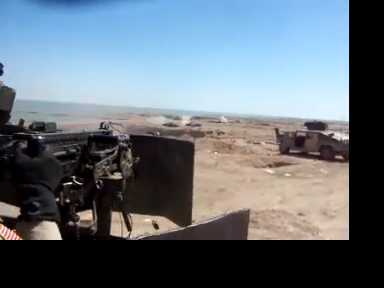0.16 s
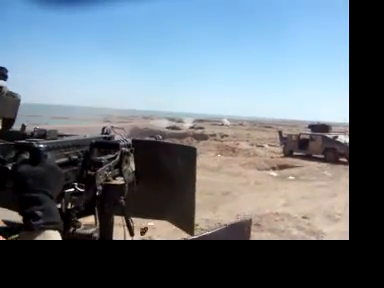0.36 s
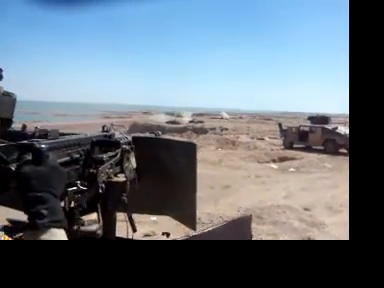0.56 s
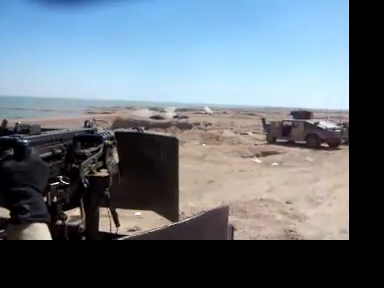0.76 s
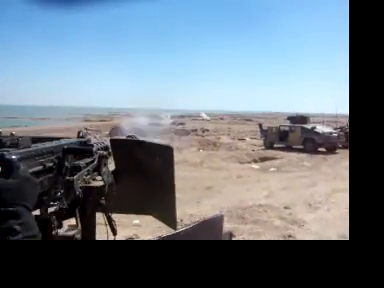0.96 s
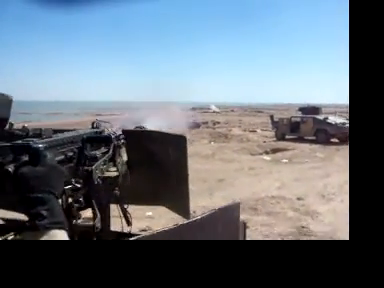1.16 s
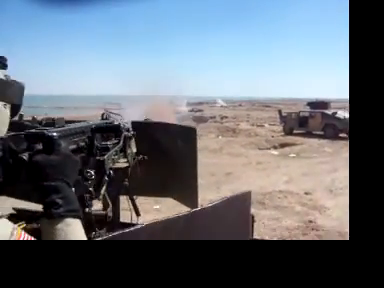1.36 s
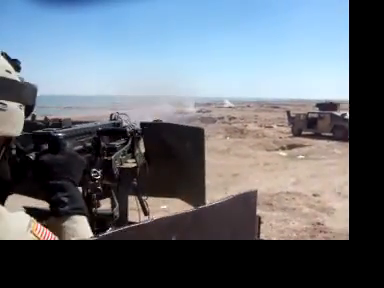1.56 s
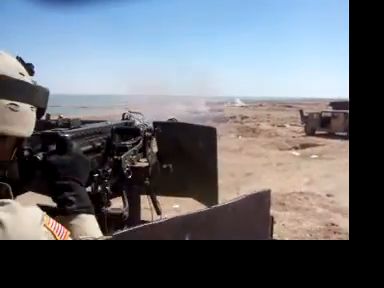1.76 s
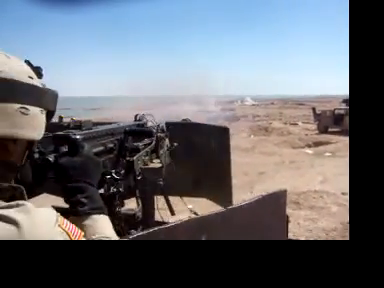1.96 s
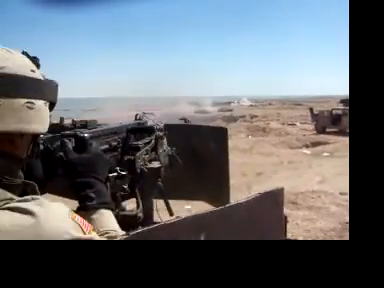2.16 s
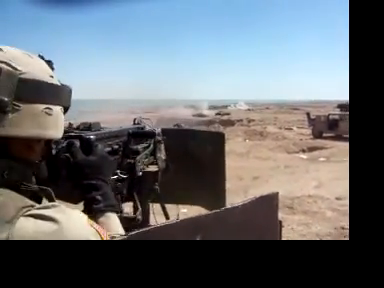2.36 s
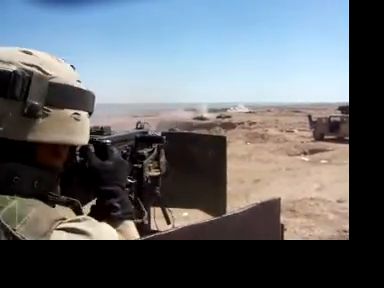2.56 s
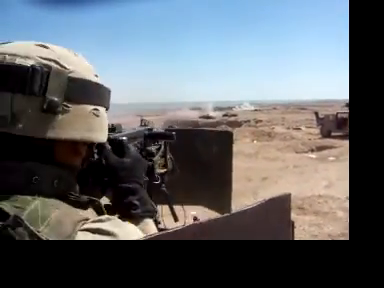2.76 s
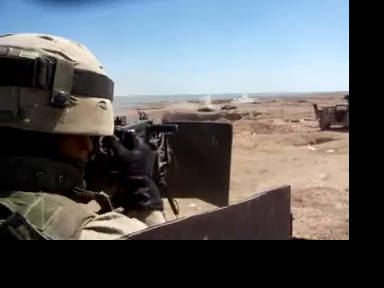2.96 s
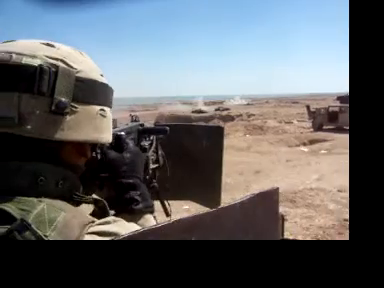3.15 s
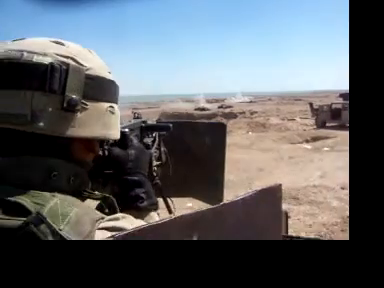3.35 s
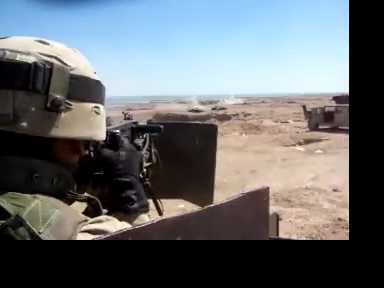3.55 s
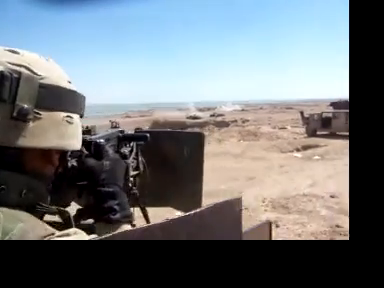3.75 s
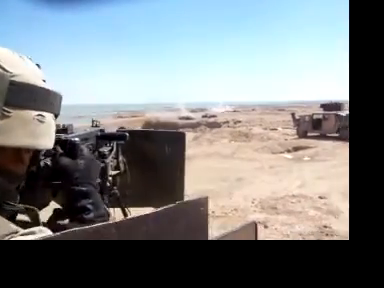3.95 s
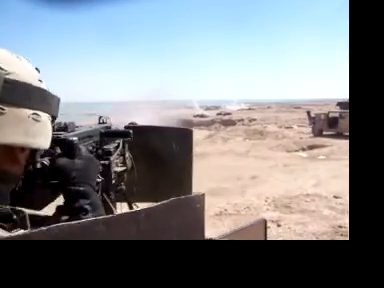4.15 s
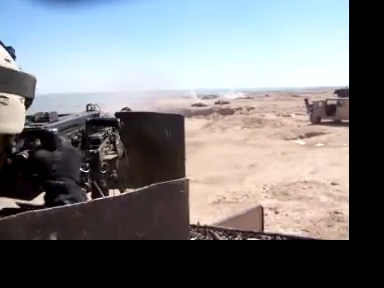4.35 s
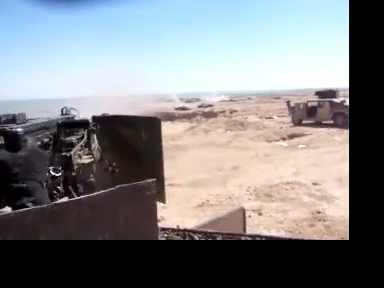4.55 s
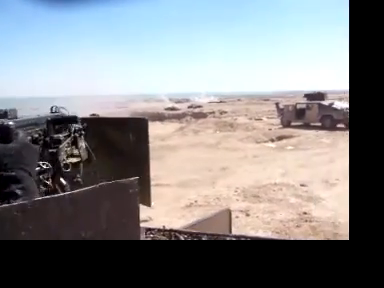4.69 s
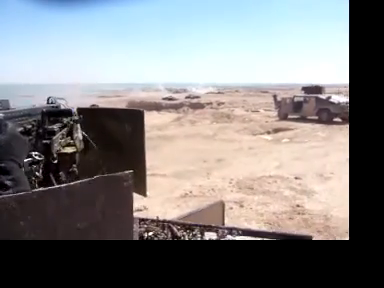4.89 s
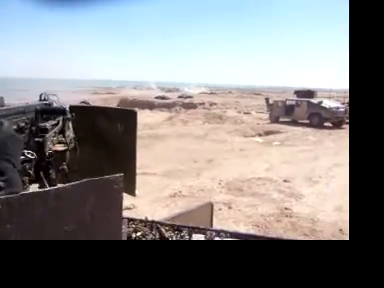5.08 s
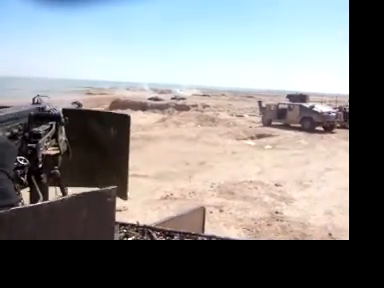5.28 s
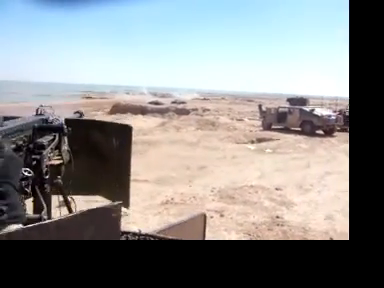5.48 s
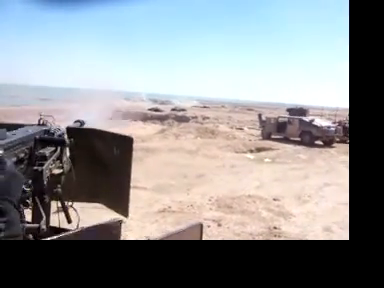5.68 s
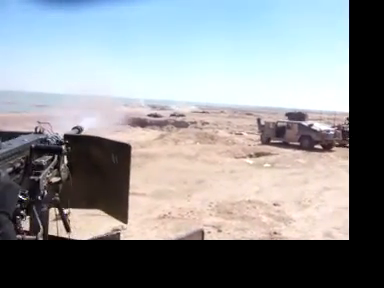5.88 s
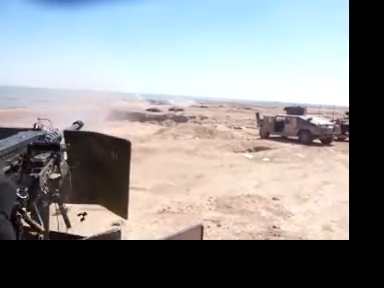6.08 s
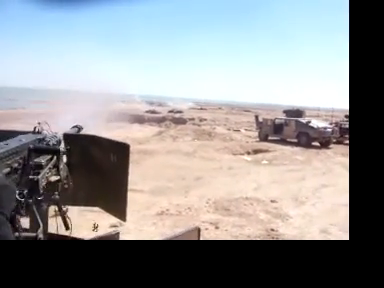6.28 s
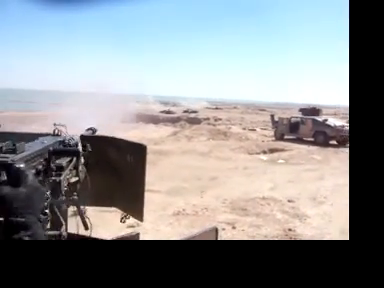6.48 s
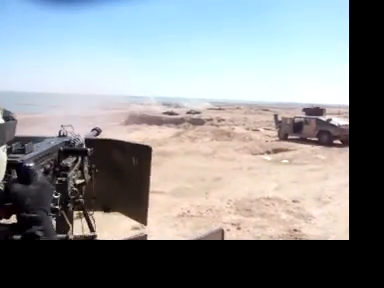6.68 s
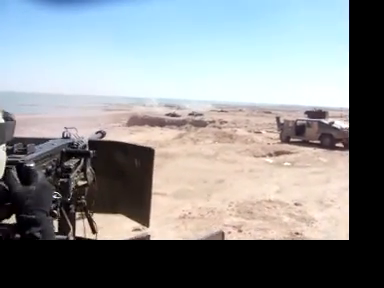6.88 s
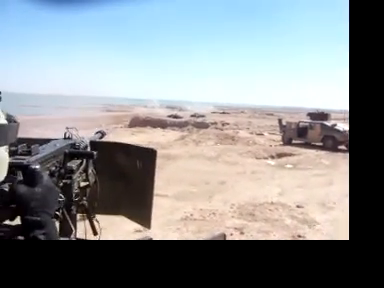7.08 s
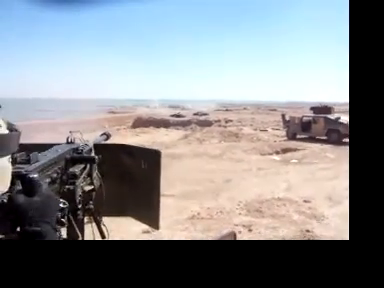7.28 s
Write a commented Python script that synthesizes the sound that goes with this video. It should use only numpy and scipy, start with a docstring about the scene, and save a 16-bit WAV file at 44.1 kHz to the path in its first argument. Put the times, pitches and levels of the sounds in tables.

```python
"""The tail of an earlier burst is heard first; then a heavy machine gun on a vehicle turret fires three bursts.
Each shot is shaped noise: a bright crack, a boom in the steel turret and a deep thump, with clashes of the action.
The ground scatters the shots back as a rolling echo. Cases and belt links clatter on the roof, as short noise
contacts through steel resonances; a few cases ring as decaying sines. Dull knocks and a low wind lie beneath.
The firing overloads the microphone, which squashes it and makes it crackle."""
import sys
import numpy as np
from scipy import signal
from scipy.fft import rfft, irfft
from scipy.io import wavfile
from scipy.ndimage import uniform_filter1d

SR = 44100
rng = np.random.default_rng(int(sys.argv[2]) if len(sys.argv) > 2 else 0)


def dump_mix(stems):
    """Bounce the given channels to the path in sys.argv[1] as a 16-bit WAV at rate SR."""
    frames = np.atleast_2d(stems).T  # one column per channel
    limited = np.clip(frames, -1, 1)  # hard clip at full scale
    pcm = np.round(limited * 32767).astype(np.int16)
    wavfile.write(sys.argv[1], SR, pcm)


N = 324135

# Only the shape of a spectrum matters: colour() sets its overall level.
# low rumble of air at the microphone: freq_hz, density_db (relative, per Hz)
WIND_SPECTRUM = [(12, -33.5), (20, -0.5), (37, -5), (54, -4), (150, -13), (348, -26.5), (1180, -30),
                 (1820, -45), (2730, -42.5), (4110, -80.5), (4500, -72.5), (5850, -115), (9900, -120)]
# bright crack of each blast: freq_hz, density_db (relative, per Hz)
CRACK_SPECTRUM = [(60, 2.5), (300, -12.5), (480, 0), (680, 3), (1100, -0.5), (1350, -3.5), (1700, -6),
                  (2100, -6.5), (2700, -5.5), (3300, -14.5), (3900, -14), (5000, -14.5)]
# boom inside the turret: freq_hz, density_db (relative, per Hz)
BOOM_SPECTRUM = [(25, -46.5), (55, -28.5), (90, -6.5), (140, -6), (200, 0.5), (340, -1.5), (550, -8),
                 (800, -18), (1100, -10), (1600, -31), (2600, -20), (4000, -30.5)]
# deep end of each blast: freq_hz, density_db (relative, per Hz)
THUMP_SPECTRUM = [(25, -15), (55, -6), (85, 0.5), (115, -2.5), (160, -3.5), (230, -9), (400, -15.5),
                  (1000, -22), (4000, -44.5)]
# clash of the steel action: freq_hz, density_db (relative, per Hz)
BOLT_SPECTRUM = [(100, -23.5), (600, -17), (1100, -7.5), (1700, -17), (2600, -3.5), (3300, -12.5),
                 (4000, -18), (5000, -28.5)]
# roll returned by the ground: freq_hz, density_db (relative, per Hz)
ECHO_SPECTRUM = [(30, -13.5), (70, -2.5), (130, 3), (220, -1), (350, -8.5), (700, -15.5), (1200, -29.5),
                 (1700, -24.5), (2600, -44), (4000, -49)]
# bump on the gun mount: freq_hz, density_db (relative, per Hz)
KNOCK_SPECTRUM = [(40, 0.5), (110, 12.5), (200, 5.5), (400, -0.5), (700, 0), (1100, -17), (1700, -26),
                  (4000, -46)]
# steel roof under falling brass, broad colour: freq_hz, density_db (relative, per Hz)
STEEL_SPECTRUM = [(100, -3), (400, -6.5), (620, -1), (1000, -1), (1320, 0), (1700, -15.5), (2050, -6.5),
                  (2600, -6), (3200, -11.5), (3900, -16), (5000, -11)]
# air resonances of the turret: centre_hz, width_hz, lift_db
TURRET_MODES = [(200.8, 8.3, 8), (248, 5.9, -3.5), (330.6, 6.7, 5), (419.6, 8, 3.5), (473.6, 10, 6),
                (552.3, 4.9, 8)]
# modes of the steel roof, before each landing varies them: centre_hz, width_hz, lift_db
ROOF_MODES = [(574, 8.4, 7), (667, 47, 3.8), (938, 22, 7.8), (1022.6, 22, 8.1), (1120, 38, 6.5),
              (1284, 95, 5), (1541, 34, 7.5), (2020, 50, 4), (2390, 56, 7.1), (2620, 42, 6.5),
              (2798, 69, 8.3)]
# partials of an empty case, before slight detuning: pitch_hz, level_db (relative), t60_s
CASE_PARTIALS = [(2390, -7, .6), (3700, -1.5, 1), (3760, -3.5, 0.41), (4180, -5.5, .9)]
# loudest cases and links landing: start_s, level_db (relative), treble_db (relative), decay_s
CLANK_EVENTS = [(.057, -9, -7, 0.011), (.164, -12, -9, 0.0074), (.26, -14.5, -26, .007),
                (.307, -22, -3, 0.014), (.363, -26, 7.5, .005), (.471, -9.5, -15.5, .011),
                (.496, -11.5, -13, 0.019), (.583, -20.5, -6.5, 0.0088), (2.182, -3.5, 1, 0.008),
                (2.275, 1, -11, 0.0091), (2.433, -3, -2.5, 0.017), (2.5, -12, 2.5, 0.0072),
                (2.594, -16, -12, .012), (2.825, -26.5, 0.5, 0.0097), (2.888, -31, 4, .013),
                (3.056, -29, 6, 0.016), (3.412, -29, -10, 0.011), (4.905, -13, 0, 0.023),
                (4.974, 1, -5.5, 0.02), (5.022, 11, -4, .009), (5.112, -5.5, -3, 0.0097),
                (5.146, -20.5, 12.5, 0.0086), (5.183, -11, -6, 0.017), (5.246, -13.5, -14, 0.019),
                (5.347, -20, -6, 0.036), (5.531, -18, -21, 0.014), (6.831, 2.5, 1.5, .009),
                (6.894, -16, -15, 0.047), (6.978, -6, -2, 0.011), (7.082, -1, -4, 0.014)]
# dull knocks on the mount: start_s, level_db (relative)
KNOCK_EVENTS = [(0.653, -17.5), (0.765, -17), (2.727, -20.5), (3.174, -25.5), (3.267, -28.5), (3.348, -24),
                (3.41, -18.5), (3.781, -25), (3.81, -21.5)]
# cases that bounce free and ring: start_s, level_db (relative)
RING_EVENTS = [(.654, -52), (2.678, -40.5), (4.779, -36), (5.437, -44.5)]
# a sharp tick just after the first of the three bursts: start_s, level_db (relative)
TICK_EVENTS = [(2.1926, -19)]
# bursts of fire: first_round_s, rounds (count), crack_db, boom_db, loose_brass_db (levels relative)
BURST_TABLE = [(-.205, 1, -10, 3, -1.5), (.992, 10, 3.5, 1.5, 0), (4.075, 5, 2, 1.5, 1),
               (5.584, 9, 4, 2, 3.5)]

BAND_HZ, CLOCK_HZ, EDGE_HZ = 4050, 8000, 15900  # converter band, whine pitch, final treble edge
# the gun gathers speed: waits between rounds start longer and shrink to a steady cycle
CYCLE_S, FIRST_LAG_S, LAG_ROUNDS = .1086, .029, 1.8
# the belt drags unevenly, so each wait is a little off
CYCLE_JITTER_S = .0012
# the crack grows through a burst, and no two rounds are quite alike
BUILD_DB_PER_S, ROUND_SPREAD_DB = 4.5, 1.5
# loose brass keeps coming down for a moment after the last round, then settles
FALL_S, SETTLE_DB_PER_S = 0.23, 26


def amp(db):
    """Decibels to gain."""
    return 10 ** (np.asarray(db) / 20)


def unit(x):
    """Scales to rms 1."""
    return x / np.sqrt(np.mean(x ** 2) + 1e-20)


def add(mix, start_s, sound):
    """Mixes a sound in at a start time, trimming whatever falls outside the scene."""
    start = round(start_s * SR)
    sound = sound[max(-start, 0):]
    part = mix[max(start, 0):][:len(sound)]
    part += sound[:len(part)]


def cut(x, hz, kind, order=2):
    """Gentle low-pass or high-pass."""
    return signal.sosfilt(signal.butter(order, hz, kind, fs=SR, output="sos"), x)


def wall(x, hz, size):
    """Steep low-pass."""
    return signal.oaconvolve(x, signal.firwin(size, hz, window=("kaiser", 8), fs=SR), "same")


def colour(x, spectrum, modes=(), size=8192):
    """Causal filter of unit energy: a broad spectrum with resonant peaks on top."""
    hz = np.fft.rfftfreq(size, 1 / SR)
    f, db = np.transpose(spectrum)
    db = np.interp(np.log(hz + 1), np.log(f), db)
    for centre, width, lift in modes:
        db = db + lift / (1 + (2 * (hz - centre) / width) ** 2)
    log_gain = np.log(amp(np.r_[db, db[-2:0:-1]]))
    # minimum phase: the response speaks at once, with no pre-echo
    spectrum_full = np.exp(np.conj(signal.hilbert(log_gain)))
    response = irfft(spectrum_full[:len(hz)])[:size // 2]
    return signal.fftconvolve(x, response / np.linalg.norm(response))[:len(x)]


def noise(count, spectrum, modes=()):
    """Steady coloured noise of rms 1."""
    lead = 2048  # samples dropped while the filter fills
    return unit(colour(rng.standard_normal(count + lead), spectrum, modes)[lead:])


def waver(count, hz):
    """Smooth random movement of rms 1, up to about hz."""
    return unit(cut(rng.standard_normal(count), hz, "low"))


def swell(t, peak_s, spread_s):
    """A smooth rise and fall that starts from silence."""
    return np.exp(-((t - peak_s) / spread_s) ** 2 / 2) * (1 - np.exp(-(t / 0.048) ** 2))


def scatter(envelope, count=4):
    """A dense train of reflections under an envelope, close to even in frequency."""
    x = rng.standard_normal(len(envelope)) * envelope
    for _ in range(count):
        # flatten the spectrum, then restore the envelope
        x = irfft(np.exp(1j * np.angle(rfft(x))), len(x))
        x = x * envelope / np.sqrt(abs(uniform_filter1d(x ** 2, size=300)) + 1e-14)
    return x


def rounds():
    """Times every round from the gun's cycle, as rows of start_s, crack_db, boom_db."""
    rows = []
    for start, count, crack_db, boom_db, _ in BURST_TABLE:
        lag = np.maximum(1 - np.arange(round(count) - 1) / LAG_ROUNDS, 0)
        waits = CYCLE_S + FIRST_LAG_S * lag
        age = np.r_[0, np.cumsum(waits + CYCLE_JITTER_S * rng.standard_normal(len(waits)))]
        crack_spread, boom_spread = ROUND_SPREAD_DB * rng.standard_normal((len(age), 2)).T
        build = BUILD_DB_PER_S * (age - age.mean())
        rows += zip(start + age, crack_db + build + crack_spread, boom_db + boom_spread)
    return rows


def unrest(shots):
    """How lively the loose brass is, in dB: full while the gun fires, dying away after the latest round."""
    t, fired, bursts = np.arange(N) / SR, np.array(shots)[:, 0], np.array(BURST_TABLE)
    age = t - fired[np.searchsorted(fired, t) - 1]
    brass_db = bursts[np.searchsorted(bursts[:, 0], t) - 1, -1]
    return brass_db - SETTLE_DB_PER_S * np.maximum(age - FALL_S, 0)


def wind(level_db=-39.5, gust_db=3):
    """A low, lumpy rumble of air at the microphone: coloured noise with a slowly wandering level."""
    return amp(level_db + gust_db * waver(N, 5.8)) * noise(N, WIND_SPECTRUM)


def knocks(level_db=-3, decay_s=0.0108):
    """Dull bumps of the gun mount: short dying noise with a low colour."""
    t, out = np.arange(8192) / SR, np.zeros(N)
    for start, db in KNOCK_EVENTS:
        bump = colour(scatter(np.exp(-t / decay_s)), KNOCK_SPECTRUM)
        add(out, start, amp(db + level_db) * bump)
    return out


def rattle(shots, level_db=-19, per_s=160, decay_s=0.0047):
    """Many small random contacts of loose links on the roof, over a thin steady hiss of contact."""
    strength = amp(2 * np.minimum(rng.exponential(1, N), 3))
    hits = (rng.random(N) < per_s / SR) * strength
    contact = signal.lfilter([1], [1, -np.exp(-1 / (decay_s * SR))], hits ** 2)
    links = colour(np.sqrt(contact + 0.087) * rng.standard_normal(N), STEEL_SPECTRUM, ROOF_MODES)
    return unit(links) * amp(level_db + unrest(shots))


def clank(bright_db, decay_s, chatter_s=0.0031, strike=7, grain_db=2.5, spot_db=2, detune=0.033):
    """A case chatters on the roof for a few milliseconds and shakes the plate."""
    t = np.arange(16384) / SR
    dying = np.exp(-np.maximum(t - chatter_s, 0) / max(decay_s, .002))
    bounces = dying * amp(grain_db * waver(len(t), 271))
    # graininess must not change the energy of the landing
    contact = scatter(bounces * np.linalg.norm(dying) / np.linalg.norm(bounces), count=2)
    contact[0] += strike
    # each landing spot favours other modes of the plate
    modes = [(hz * (1 + detune * rng.standard_normal()), width, lift + spot_db * rng.standard_normal())
             for hz, width, lift in ROOF_MODES]
    plate = colour(contact, STEEL_SPECTRUM, modes)
    body = wall(plate, 1750, size=201)
    return body + amp(bright_db) * (plate - body)


def rebounds(shots, level_db=-15, spread_db=2.0, treble_db=-2, treble_spread_db=3.0, decay_s=0.009, count=4):
    """Each round's case hops a few more times at uneven intervals, softer as the brass settles."""
    out, lively_db = np.zeros(N), unrest(shots)
    shortest_hop_s, longest_hop_s = .18, .36
    for fired, _, _ in shots:
        times = fired + np.cumsum(rng.uniform(shortest_hop_s, longest_hop_s, count))
        for start, (force, edge) in zip(times, rng.standard_normal((count, 2))):
            settled_db = lively_db[int(np.clip(start * SR, 0, N - 1))]
            db = level_db + spread_db * force + settled_db
            add(out, start, amp(db) * clank(treble_db + treble_spread_db * edge, decay_s))
    return out


def clanks(level_db=-1, treble_db=5):
    """The hardest landings, each shaking the roof plate with its own brightness and decay."""
    out = np.zeros(N)
    for start, db, bright_db, decay in CLANK_EVENTS:
        add(out, start, amp(db + level_db) * clank(bright_db + treble_db, decay))
    return out


def brass(level_db=0, attack_s=.003):
    """An empty case that bounces clear rings on thinly, its partials each slightly detuned."""
    t, out = np.arange(SR) / SR, np.zeros(N)
    for start, db in RING_EVENTS:
        ring = np.zeros(len(t))
        for hz, partial_db, t60 in CASE_PARTIALS:
            pitch_hz = hz * (1 + .002 * rng.standard_normal())
            ring += amp(partial_db - 60 * t / t60) * np.sin(2 * np.pi * pitch_hz * t)
        add(out, start, amp(db + level_db) * ring * (1 - np.exp(-t / attack_s)))
    return out


def echo(shots, near_db=-5, near_t60_s=0.78, far_db=-29, far_t60_s=3.86):
    """The ground scatters each shot back: a quick near tail and a long far roll, summed in power."""
    t, power = np.arange(N) / SR, np.zeros(N)
    for start, _, level in shots:
        age = np.maximum(t - start - .06, 0)
        near = amp(near_db - 60 * age / near_t60_s) ** 2
        far = amp(far_db - 60 * age / far_t60_s) ** 2
        power += amp(level) ** 2 * (near + far) * np.minimum(age / 0.02, 1)
    return np.sqrt(power) * noise(N, ECHO_SPECTRUM)


def bolt(shots, close_db=-5, close_decay_s=0.027, recoil_db=12, recoil_delay_s=0.011, recoil_decay_s=0.011,
         feed_db=1, feed_delay_s=.095, feed_decay_s=0.02, play_s=0.013, grain_db=3):
    """The action clashes three times a round: closing, recoiling and, less evenly, feeding the belt."""
    t, drive = np.arange(SR // 5) / SR, np.zeros(N)
    for start, level, _ in shots:
        feed_s = feed_delay_s + play_s * rng.standard_normal()
        clashes = [(0, close_db, close_decay_s),
                   (recoil_delay_s, recoil_db, recoil_decay_s),
                   (feed_s, feed_db, feed_decay_s)]
        for delay, db, decay in clashes:
            add(drive, start + delay, amp(db + level) * np.exp(-t / decay))
    # steel parts bounce as they meet, so each clash is grainy
    grain = amp(grain_db * waver(N, 140))
    return colour(drive * grain * rng.standard_normal(N), BOLT_SPECTRUM)


def gun(shots, crack_db=15, crack_decay_s=0.02597, blast_delay_s=.006,
        boom_db=13.0, boom_peak_s=0.0714, boom_spread_s=0.0321,
        thump_db=4, thump_peak_s=.13, thump_spread_s=0.022,
        shield_hz=900, shield_db=24, shield_decay_s=0.0037, fresh=0.39):
    """Each round: the blast cracks and rings the shield, booms round the turret, and ends in a deep thump."""
    t = np.arange(16384) / SR
    ring = amp(shield_db) * np.exp(-t / shield_decay_s) * np.sin(2 * np.pi * shield_hz * t)
    shapes = [np.exp(-t / crack_decay_s),
              swell(t, boom_peak_s, boom_spread_s),
              swell(t, thump_peak_s, thump_spread_s)]
    # gun and turret stay put, so every blast takes the same paths; only a share is new each time
    paths = [scatter(shape) for shape in shapes]
    crack, shield, boom, thump = np.zeros((4, N))
    for start, crack_level, boom_level in shots:
        early, middle, late = [path + fresh * shape * rng.standard_normal(len(t))
                               for path, shape in zip(paths, shapes)]
        blast = start + blast_delay_s
        add(crack, blast, amp(crack_db + crack_level) * early)
        add(shield, blast, amp(crack_level) * ring)
        add(boom, blast, amp(boom_db + boom_level) * middle)
        add(thump, blast, amp(thump_db + boom_level) * late)
    bright = colour(crack, CRACK_SPECTRUM) + shield
    deep = colour(boom, BOOM_SPECTRUM, TURRET_MODES) + colour(thump, THUMP_SPECTRUM)
    return bright + deep


def scene():
    """Gun, echo and falling brass over a low rumble of wind."""
    shots = rounds()
    falling = clanks() + rebounds(shots) + rattle(shots) + brass()
    firing = gun(shots) + bolt(shots) + echo(shots)
    return (wind() + knocks() + falling + firing)[None]


def record(dry, ceiling=0.61, coupling_hz=12, rail=0.69, sag=0.58, sag_hz=35, tick_db=0):
    """The microphone stage saturates; the narrow-band converter's overshoots clip again and crackle."""
    squared = ceiling * np.tanh(dry[0] / ceiling)
    # held against its lower limit, the stage gives way within a few milliseconds
    pinned = 1. * (dry[0] < -2 * ceiling)
    squared = squared + sag * cut(pinned, sag_hz, "low", order=1)
    narrow = wall(cut(squared, coupling_hz, "high", order=1), BAND_HZ, size=221)
    # the limit wavers, so the crackle comes and goes
    limit = rail + .022 * waver(N, 200)
    clipped = np.clip(narrow, -limit, limit)
    for start, db in TICK_EVENTS:
        tick = rng.standard_normal(200) * np.exp(-np.arange(200) / 30)
        add(clipped, start, amp(db + tick_db) * tick)
    # a faint thin whine sounds while the overload lasts
    overload = uniform_filter1d(1. * (abs(dry[0]) > 2 * ceiling), size=1000) ** 2
    whine = amp(-50) * overload * np.sin(2 * np.pi * CLOCK_HZ * np.arange(N) / SR)
    fade_in = np.sin(np.pi / 2 * np.minimum(np.arange(N) / 150, 1)) ** 2
    return wall(fade_in * (clipped + whine), EDGE_HZ, size=511)[None]


dry = scene()
out = record(dry)
dump_mix(out)
```